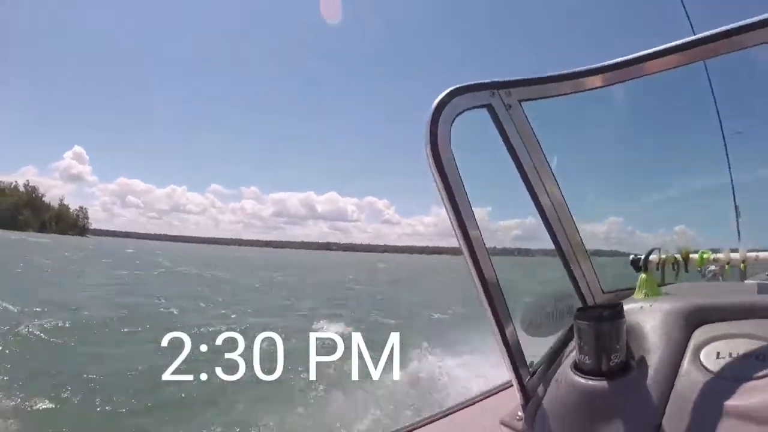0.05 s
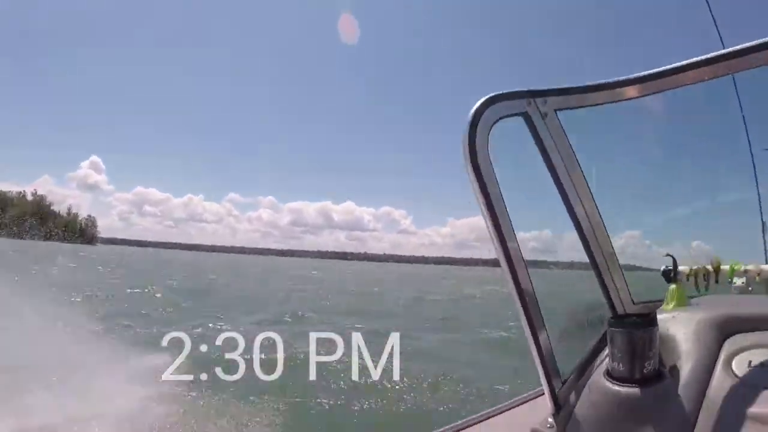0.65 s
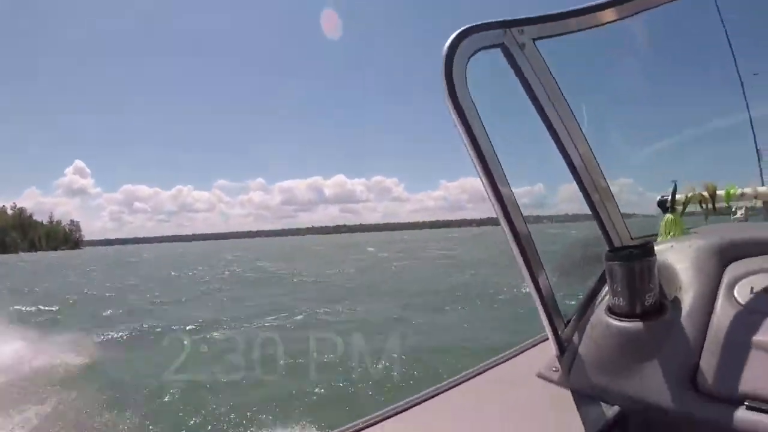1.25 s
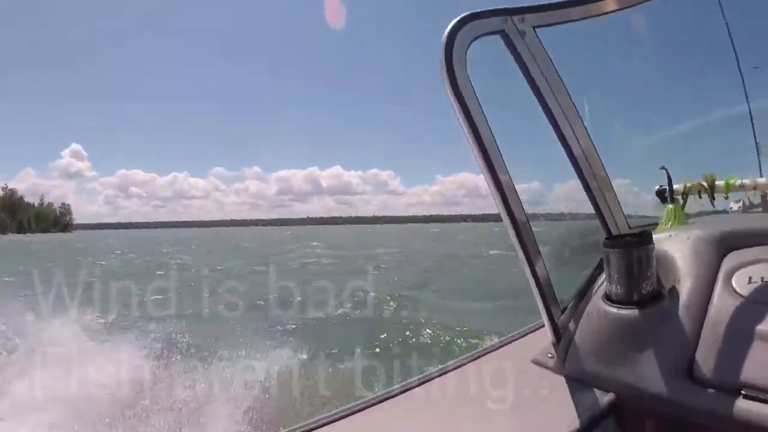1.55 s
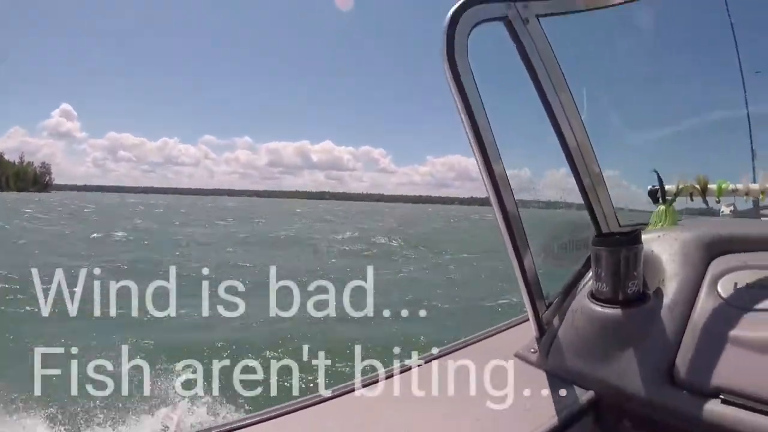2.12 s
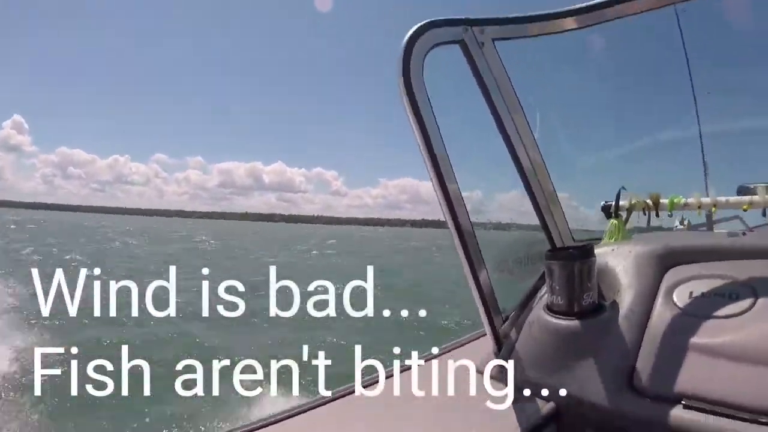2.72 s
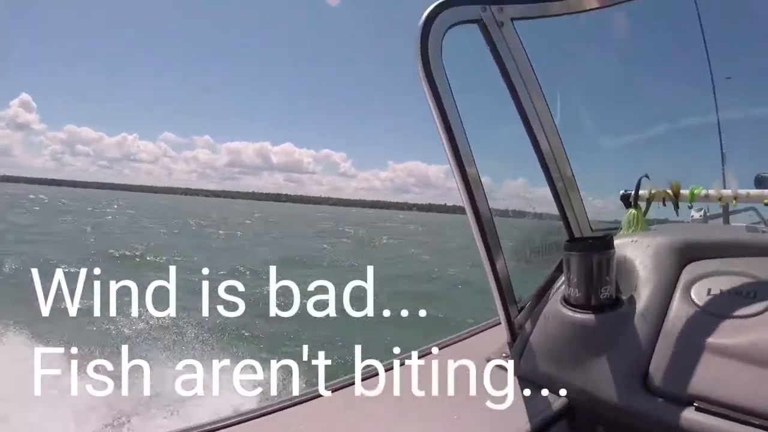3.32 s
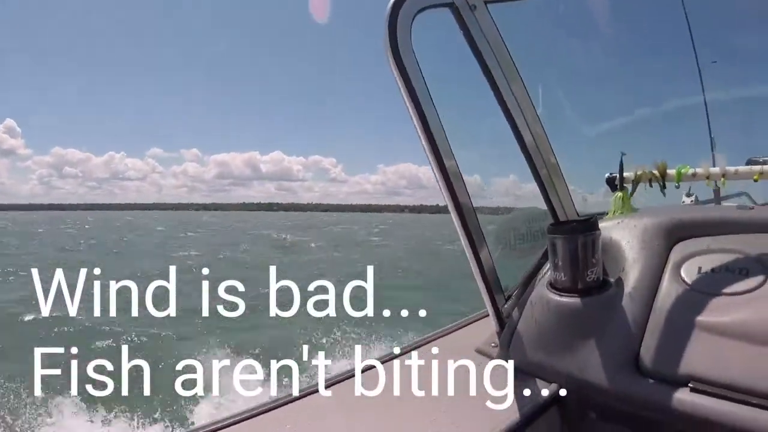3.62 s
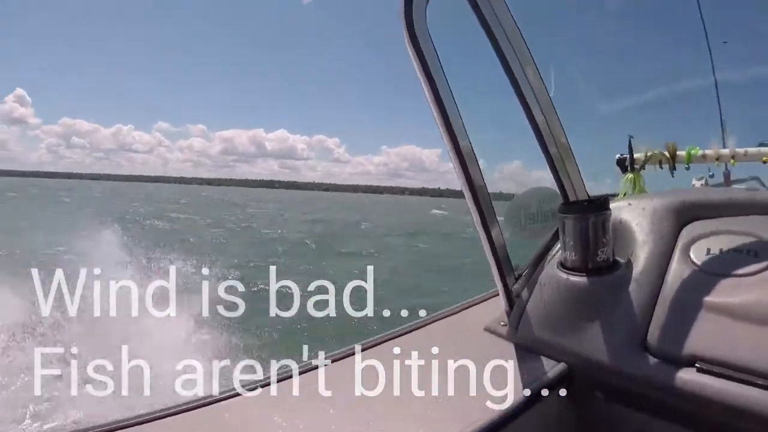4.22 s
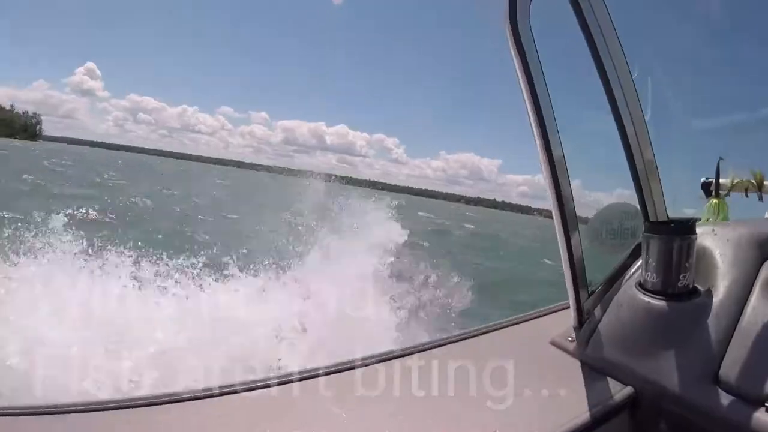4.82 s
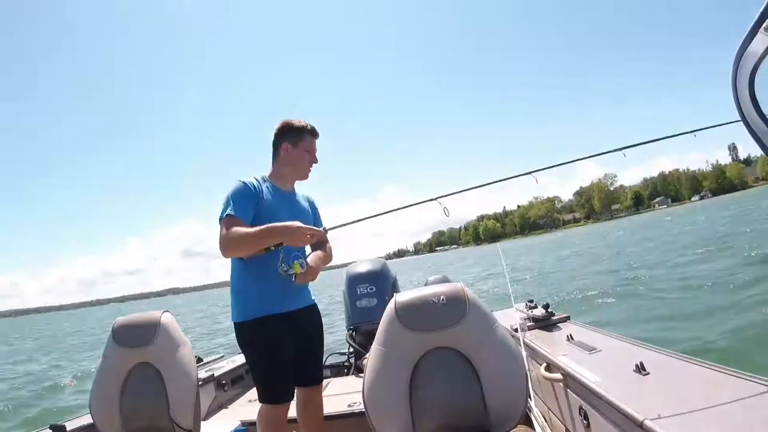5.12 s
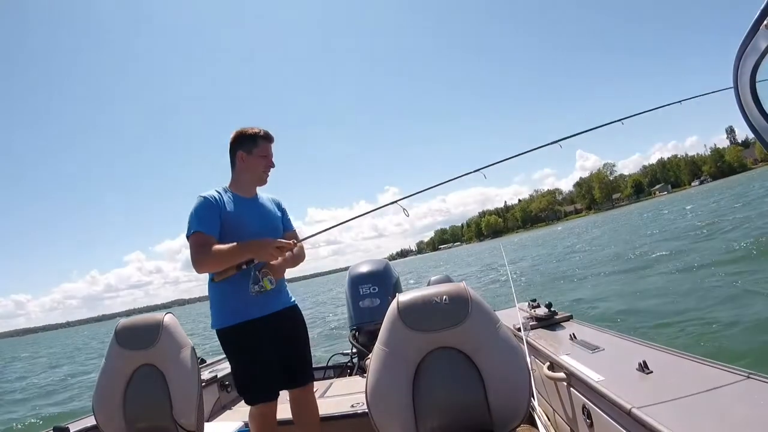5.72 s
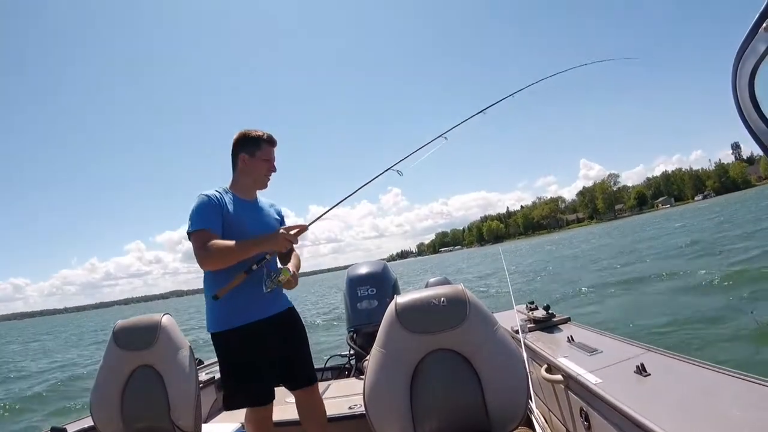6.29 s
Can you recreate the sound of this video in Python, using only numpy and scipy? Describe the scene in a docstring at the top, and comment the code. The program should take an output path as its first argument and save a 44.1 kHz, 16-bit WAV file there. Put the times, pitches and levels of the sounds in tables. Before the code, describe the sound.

On a fishing boat speeding over a lake, uneven gusts batter the microphone with low rumbling and short tearing rasps. Repeated surges of wash and spray sound beneath the wind, along with a quiet outboard drone whose thin whine rises in level near the end of the run. A split-second silence follows. The motor and spray are gone, leaving muffled buffeting, light crackle and softly hissing water.

```python
"""Wind buffets and tears at a camera microphone aboard a fishing boat running fast over a choppy lake.
Close by, the hull throws a sheet of spray at each wave, and the outboard drones underneath.
Eddies rumble, flap and pop right on the microphone port; the limiter ducks under the hardest gusts.
After a short break the boat lies adrift: duller wind thumps and ticks over a faint hiss of water."""
import sys
import numpy as np
from scipy import signal
from scipy.fft import rfft, irfft, next_fast_len
from scipy.io import wavfile
from scipy.ndimage import uniform_filter1d, minimum_filter1d, map_coordinates

SR = 44100
rng = np.random.default_rng(int(sys.argv[2]) if len(sys.argv) > 2 else 0)


def file_out(sig):
    """Save sig as 16-bit WAV at sys.argv[1]."""
    # one column per channel
    cols = np.atleast_2d(sig).T
    # limit, then scale
    lim = np.clip(cols, -1, 1)
    pcm = np.round(lim * 32767).astype(np.int16)
    wavfile.write(sys.argv[1], SR, pcm)


N = 280028

# gusts hitting the microphone: t/s, length/s, relative body level/dB, relative tearing level/dB
GUSTS = [(.01, 0.023, -16, -40), (.357, 0.038, -18.5, -45), (.455, .018, -15, -33),
         (.61, 0.044, -14.5, -31), (.664, 0.017, -7.5, -19), (.793, .008, -11, -20), (.9, 0.013, -20, -52),
         (1.102, 0.0084, -18.5, -35), (1.2, 0.051, -20, -48), (1.396, .022, -12.5, -39),
         (1.444, 0.028, -18.5, -32), (1.622, 0.018, -8, -29), (1.72, 0.019, -19, -34),
         (1.78, 0.071, -17, -30.5), (1.953, 0.056, -14.5, -23), (2.12, 0.019, -18, -48),
         (2.205, .021, -16, -26), (2.28, 0.053, -15, -36), (2.519, .018, -9.5, -21),
         (2.664, 0.027, -10.5, -45), (2.912, .085, -18.5, -40), (3.146, 0.048, -12, -26.5),
         (3.245, 0.036, -10, -23), (3.695, 0.088, -17, -41), (3.915, .03, -13, -35),
         (4.005, 0.029, -12.5, -35), (4.134, 0.033, -19, -31), (4.55, .03, -14.5, -39),
         (4.646, .013, -10.5, -34), (4.872, .02, -14.5, -28), (4.93, 0.068, -19, -40),
         (5.264, 0.012, -22.5, -43), (5.362, 0.021, -18.5, -41.5), (5.396, .022, -18, -44),
         (5.477, 0.0483, -23.5, -32), (5.642, 0.018, -22.5, -49), (5.745, .021, -20.5, -38),
         (5.928, 0.036, -15.5, -34.5), (6.058, .014, -21.5, -42), (6.096, 0.018, -24, -42.5),
         (6.172, 0.028, -19.5, -40), (6.292, 0.025, -20, -52)]


def amp(db):
    """Decibels to gain."""
    return 10 ** (np.asarray(db) / 20)


def unit(x):
    """Scaled to rms 1."""
    return x / np.sqrt(np.mean(x ** 2) + 1e-20)


def clock():
    """The time of each sample."""
    return np.arange(N) / SR


def curve(rows):
    """Straight lines through (t/s, value) points, one value per sample."""
    return np.interp(clock(), *np.transpose(rows))


def wobble(rate):
    """A smooth random curve, rate knots a second."""
    knots = rng.standard_normal(int(N * rate / SR) + 4)
    return map_coordinates(knots, [np.arange(N) * rate / SR])


def swells(rows, rise_s, fall_s):
    """Rise, hold and fall for rows of (t/s, length/s, level/dB, level/dB): a gain curve for each level."""
    t, power = clock(), np.zeros((2, N))
    for start, length, *levels in rows:
        near = slice(max(int((start - 6 * rise_s) * SR), 0), int((start + length + 6 * fall_s) * SR))
        before, after = np.maximum(start - t[near], 0), np.maximum(t[near] - start - length, 0)
        shape = np.exp(-before / rise_s - after / fall_s)
        power[:, near] += (amp(levels)[:, None] * shape) ** 2
    return np.sqrt(power)


def filtered(x, response):
    """x through a response given as a function of frequency."""
    size = next_fast_len(N + SR // 4)
    return irfft(rfft(x, size) * response(np.fft.rfftfreq(size, 1 / SR)), size)[:N]


def dulled(x, corner_hz):
    """A steep causal low-pass."""
    b, a = signal.butter(N=4, Wn=1, analog=True)
    return filtered(x, lambda hz: b[0] / np.polyval(a, 1j * hz / corner_hz))


def coloured(x, spectrum):
    """x shaped by (f/Hz, level/dB) points on a log axis, at rms 1."""
    f, db = np.transpose(spectrum)
    return unit(filtered(x, lambda hz: amp(np.interp(np.log(hz + 1), np.log(f), db))))


def noise(spectrum):
    """Coloured noise of rms 1."""
    return coloured(rng.standard_normal(N), spectrum)


def eddies(spectrum, size):
    """Turbulent pressure whose strength stays even over spans of size samples."""
    pressure = noise(spectrum)
    power = uniform_filter1d(uniform_filter1d(pressure ** 2, size), size)
    return unit(pressure / np.sqrt(np.abs(power) + 1e-4))


def lake(level_db):
    """Calm water hisses faintly around the drifting boat."""
    # spectrum of the hiss: f/Hz, level/dB
    hiss_spectrum = [(200, 7), (900, 10.5), (1600, -1), (2200, -9.5), (3200, -7.5), (4400, -19.5),
                     (5500, -16), (7200, -9), (10200, -12), (12000, -22), (15000, -33)]
    return amp(level_db) * noise(hiss_spectrum)


def outboard(firing_hz, whine_hz, waver, rough_db):
    """Exhaust orders and gear whine follow the shaft, whose speed wavers as the propeller bites."""
    # exhaust tones: multiple of the firing rate, level/dB
    orders = [(2, -34), (3, -35), (4, -41.5), (5, -39.5), (9, -46)]
    # gear whine, swelling near the end of the run: t/s, level/dB
    whine_levels = [(0, -46.5), (4.2, -54), (4.5, -38), (5.1, -42)]
    phase_per_hz = 2 * np.pi * np.cumsum(1 + waver * wobble(5)) / SR
    exhaust = np.zeros(N)
    for order, db in orders:
        gain = amp(db + rough_db * wobble(12))
        exhaust += gain * np.sin(order * firing_hz * phase_per_hz + rng.uniform(0, 2 * np.pi))
    whine = amp(curve(whine_levels) + 1.7 * wobble(20)) * np.sin(whine_hz * phase_per_hz)
    return np.sqrt(2) * (exhaust + whine)


def hull_water(wash_db, spray_db, drops_db, churn_db):
    """The hull churns the water, and every wave throws up a hissing sheet of countless drops."""
    # the bow cuts into a wave: t/s, length/s, relative spray level/dB, relative wash level/dB
    waves = [(0, 0.15, -43.5, -33), (.49, .05, -46.5, -45), (.625, .035, -36.5, -31),
             (.73, 0.031, -44.5, -30), (1.07, 0.19, -46, -41.5), (1.61, .03, -39.5, -34),
             (1.76, 0.17, -45, -43), (2.22, 0.061, -44.5, -30), (2.59, 0.26, -44.5, -35),
             (3.07, 0.15, -43.5, -37.5), (3.37, .1, -45, -50), (3.59, 0.046, -45.5, -32),
             (4.0, 0.16, -44, -35), (4.38, 0.054, -40, -37), (4.56, 0.12, -42.5, -30),
             (5.0, 0.086, -43, -37)]
    # steady wash along the hull: t/s, relative level/dB
    wash_levels = [(0, -33), (.95, -38), (2.1, -33), (2.5, -35.5), (3.6, -32.5), (5.11, -33.5)]
    # spectra of the wash and the spray: f/Hz, level/dB
    wash_spectrum = [(80, -10.5), (250, 6.5), (500, 2), (700, 0.5), (1100, -3), (1500, -10), (2100, -16.5),
                     (3200, -18.5), (4500, -35.5), (9000, -67)]
    spray_spectrum = [(600, -23), (1500, 3.5), (2200, 0), (2800, 5.5), (3450, 2.5), (3950, -5),
                      (4650, -6.5), (5500, 2.5), (7600, 1), (9500, -9.5), (11200, -15.5), (12200, -12.5),
                      (15000, -22.5)]
    thrown, churned = swells(waves, rise_s=0.11, fall_s=0.092)
    wash_gain = amp(wash_db) * np.hypot(amp(curve(wash_levels)), churned)
    spray_gain = np.hypot(amp(-48.5), thrown)  # fine mist hangs on between the waves
    churn = noise(wash_spectrum) * amp(churn_db * wobble(25))
    drops = rng.standard_normal(N) * (rng.random(N) < 2500 / SR)  # 2500 drops a second
    sheet = coloured(rng.standard_normal(N) + amp(drops_db) * unit(drops), spray_spectrum)
    return wash_gain * churn + amp(spray_db + .4 * wobble(35)) * spray_gain * sheet


def crackle(wind, per_s, corner_hz):
    """Small eddies break on the port as dry ticks, the stronger the harder the wind presses."""
    ticks = wind * rng.uniform(-0.92, 1, N) * (rng.random(N) < per_s / SR)
    return dulled(ticks, corner_hz)


def pops(gain_db, leak_s, edge_hz, corner_hz):
    """An eddy breaks: the pressure drops at once and leaks back through the port, which rounds the edge."""
    # pressure jumps on the port: t/s, relative level/dB
    jumps = [(0.7934, -10.5), (1.6315, -9.5), (1.799, -20), (1.954, -25), (2.2835, -17.5), (2.522, -17),
             (3.2441, -20), (5.414, -35.5), (5.4883, -35), (5.5243, -36), (5.93, -33.5), (5.9565, -31),
             (6.2004, -18.5)]
    pressure = np.zeros(N)
    leak = np.exp(-np.arange(SR // 20) / SR / leak_s)
    for start, db in jumps:
        pressure[round(start * SR):][:len(leak)] -= amp(db + gain_db) * leak
    rounded = filtered(pressure, lambda hz: 1 / (1 + 1j * hz / edge_hz))
    return dulled(dulled(rounded, corner_hz), corner_hz)


def buffeting(wind_levels, spectrum, rumble_db, buffet_db, eddy_db, flutter_db, unrest_db):
    """Large eddies rumble and swell around each gust; smaller ones flap on the port in uneven bursts."""
    # spectrum of the large eddies: f/Hz, level/dB
    rumble_spectrum = [(10, -18), (22, -1), (35, -1), (85, -3.5), (120, -9.5), (170, -17), (400, -53),
                       (900, -100)]
    wind_db = curve(wind_levels)
    surge, _ = swells(GUSTS, rise_s=.017, fall_s=.016)
    rumble_gain = np.hypot(amp(wind_db + rumble_db), amp(eddy_db) * surge)
    turbulence = eddies(spectrum, size=900)
    flaps = unit(turbulence * amp(flutter_db * np.tanh(wobble(60)) + unrest_db * wobble(16)))
    return rumble_gain * eddies(rumble_spectrum, size=1800) + amp(wind_db + buffet_db) * flaps


def gusts(spectrum, body_db, tear_db, rasp_db, grain_db):
    """Each gust grips the port abruptly and lets go; the flow tears off in rasps on its pressure crests."""
    # spectrum of the tearing flow: f/Hz, level/dB
    tear_spectrum = [(200, -22), (550, 10), (850, 5), (1200, -3.5), (1600, -15.5), (2100, -24.5),
                     (3200, -23), (4500, -49), (9000, -65.5)]
    body, tear = swells(GUSTS, rise_s=.001, fall_s=.003)
    pressure = eddies(spectrum, size=300)
    fine_eddies = eddies(tear_spectrum, size=150)
    rasp = unit(fine_eddies * amp(rasp_db * np.tanh(pressure) + grain_db * np.tanh(wobble(160))))
    return amp(body_db) * body * pressure + amp(tear_db) * tear * rasp


def scene():
    """From on board, in mono: the fast run, a moment of silence, then the drift in slower, duller air."""
    # wind between the gusts, under way and adrift: t/s, relative level/dB
    headwind = [(0, -14.5), (.15, -15), (.22, -19.5), (.55, -16.5), (.74, -21.5), (.94, -18), (1.06, -25),
                (1.17, -18.5), (1.3, -31), (1.5, -18), (1.68, -29.5), (2.1, -20), (2.42, -21),
                (2.76, -19.5), (3.1, -19.5), (3.44, -28), (3.55, -17), (3.85, -19), (4.28, -14.5),
                (4.5, -19), (4.62, -16), (4.76, -22.5), (5.11, -17.5)]
    drift_wind = [(5.2, -16.5), (5.24, -16.5), (5.57, -19), (5.7, -16), (5.82, -22), (5.9, -16.5),
                  (6.34, -16)]
    # spectra of the buffeting and gusts under way, and of the breeze adrift: f/Hz, level/dB
    buffet_spectrum = [(50, -18), (120, -5.5), (165, 4), (270, -1.5), (390, -9), (470, -14.5), (600, -19),
                       (1000, -41.5), (2000, -68), (4500, -89)]
    gust_spectrum = [(60, -9.5), (160, 8.5), (320, 0), (450, -6), (560, -10.5), (800, -19.5), (1500, -46),
                     (4000, -85.5)]
    breeze_spectrum = [(50, -21.5), (95, -4.5), (140, 2), (200, -5.5), (280, -11.5), (400, -18), (600, -27),
                       (1000, -42), (2000, -64.5), (4500, -94.5)]
    t, stop_s, resume_s = clock(), 5.12, 5.19
    running = np.clip((stop_s - t) / .002, 0, 1)
    adrift = np.clip((t - resume_s) / .02, 0, 1)
    wind_pops = pops(gain_db=15.5, leak_s=0.0013, edge_hz=680, corner_hz=3200)

    run = buffeting(headwind, buffet_spectrum, rumble_db=0, buffet_db=-4, eddy_db=1.5,
                    flutter_db=5, unrest_db=1.5)
    run += gusts(gust_spectrum, body_db=1.2, tear_db=-0.5, rasp_db=4.5, grain_db=5)
    run += hull_water(wash_db=3.5, spray_db=2.5, drops_db=-5.5, churn_db=1.13)
    run += outboard(firing_hz=76.06, whine_hz=1004, waver=0.00442, rough_db=3)

    breeze = buffeting(drift_wind, breeze_spectrum, rumble_db=0.5, buffet_db=-7, eddy_db=4.5,
                       flutter_db=7.5, unrest_db=3.5)
    breeze += dulled(gusts(breeze_spectrum, body_db=4, tear_db=1, rasp_db=6, grain_db=7), corner_hz=1400)
    drift = breeze + crackle(breeze, per_s=160, corner_hz=1000) + lake(level_db=-55.5)
    return (running * (run + wind_pops) + adrift * (drift + wind_pops))[None]


def limiter(x, ceiling_db, release_db_per_s):
    """Turns the gain down just before a peak and lets it creep back."""
    over_db = np.maximum(20 * np.log10(np.abs(x) + 1e-9) - ceiling_db, 0)
    release_db = release_db_per_s * clock()
    cut_db = np.maximum.accumulate(over_db + release_db) - release_db
    return x * uniform_filter1d(minimum_filter1d(amp(-cut_db), size=89), size=89)


def record(dry):
    """The camera limits the peaks and keeps nothing above its band limit."""
    held = limiter(dry[0], ceiling_db=-0.97, release_db_per_s=61)
    return filtered(held, lambda hz: hz < 15450)[None]


dry = scene()
out = record(dry)
file_out(out)
```